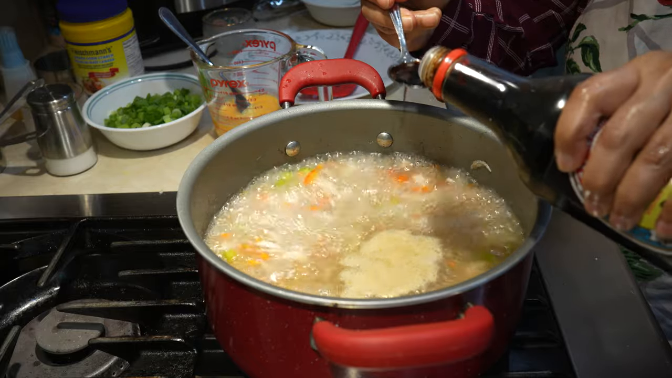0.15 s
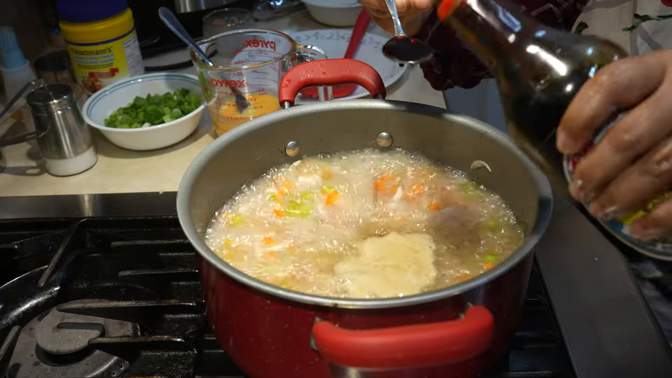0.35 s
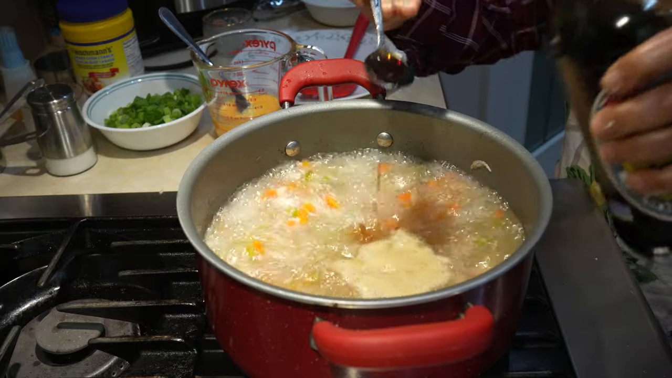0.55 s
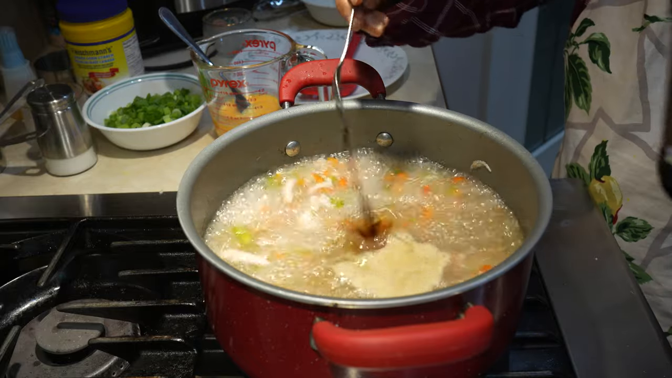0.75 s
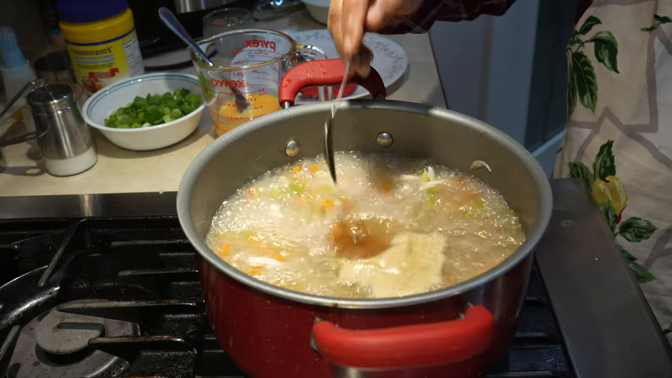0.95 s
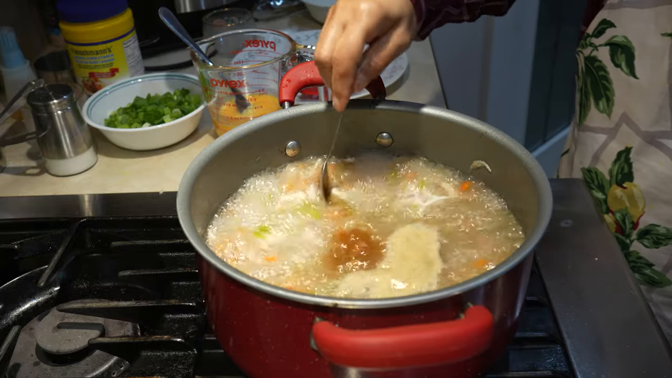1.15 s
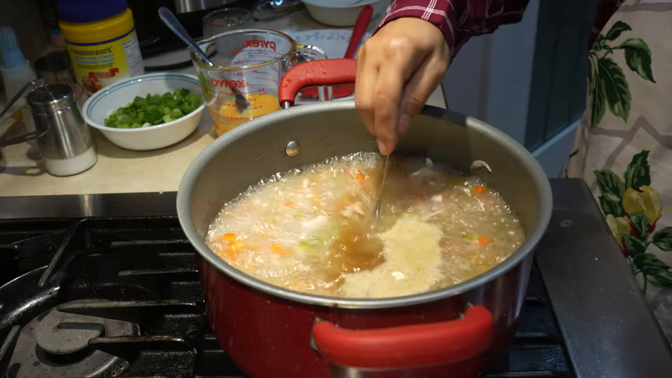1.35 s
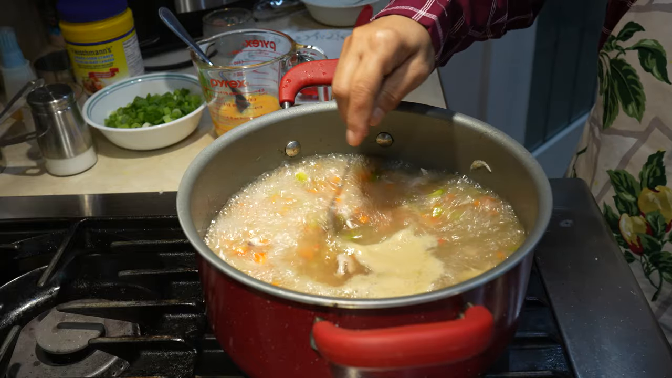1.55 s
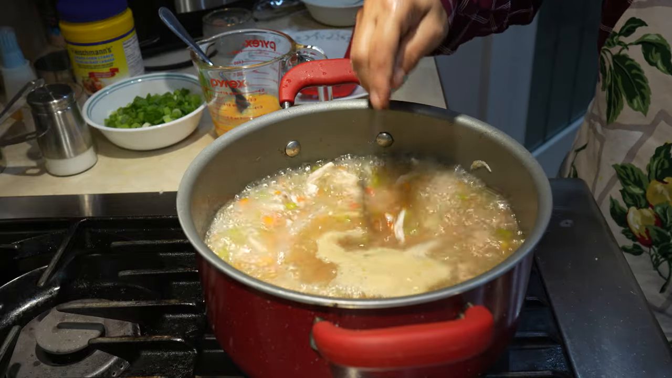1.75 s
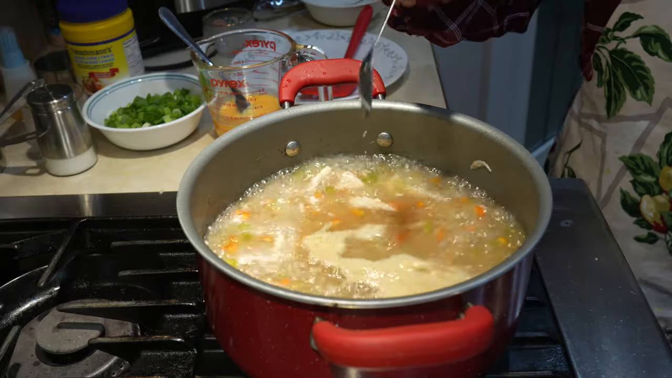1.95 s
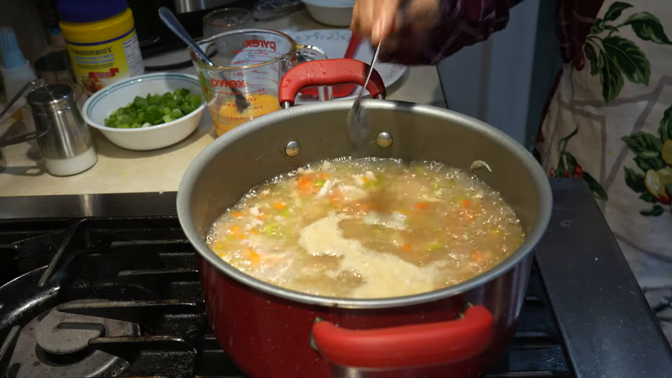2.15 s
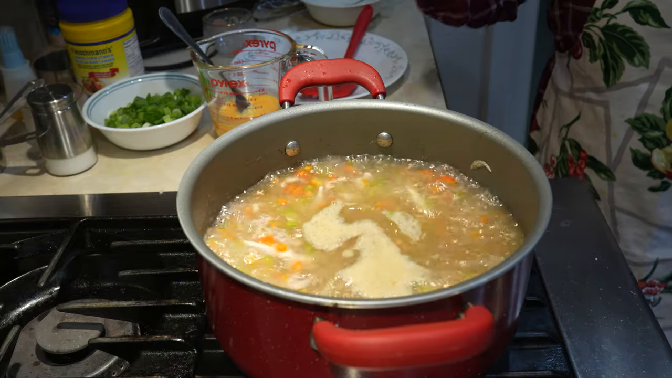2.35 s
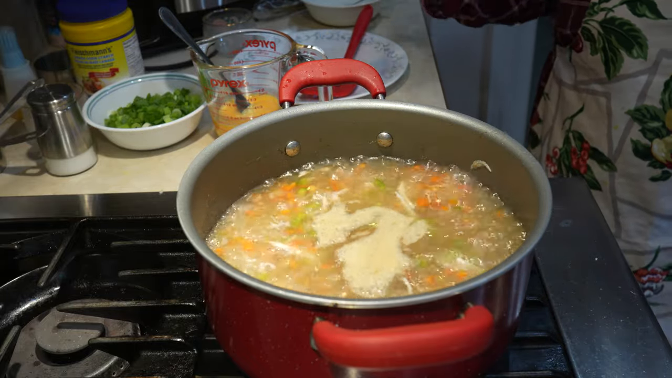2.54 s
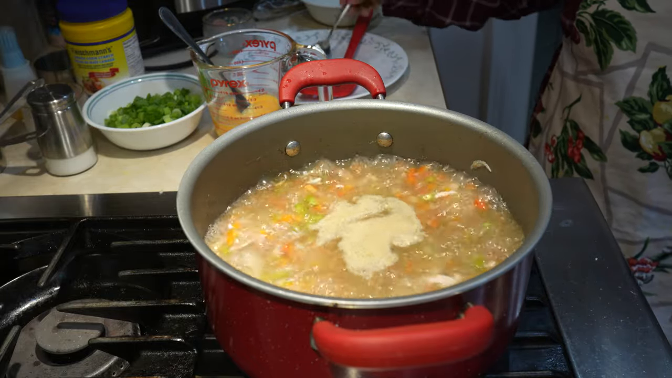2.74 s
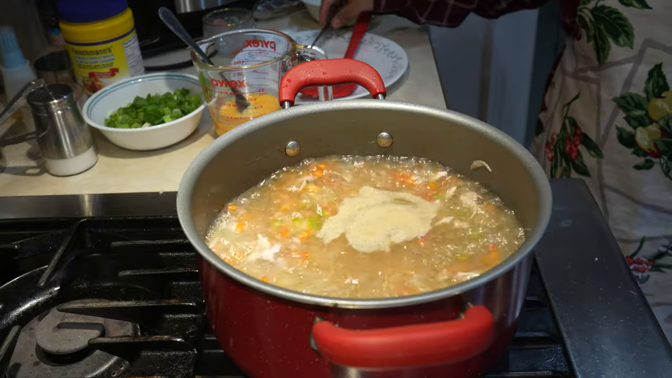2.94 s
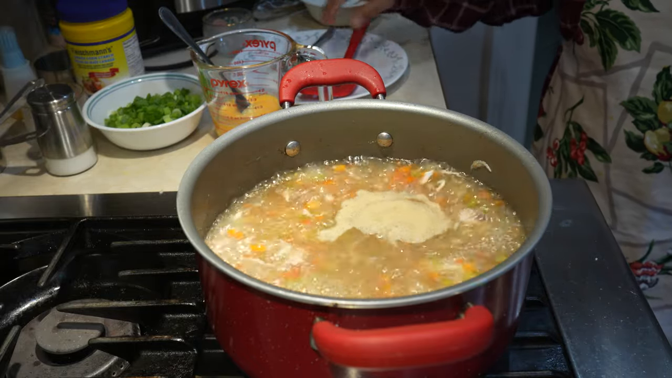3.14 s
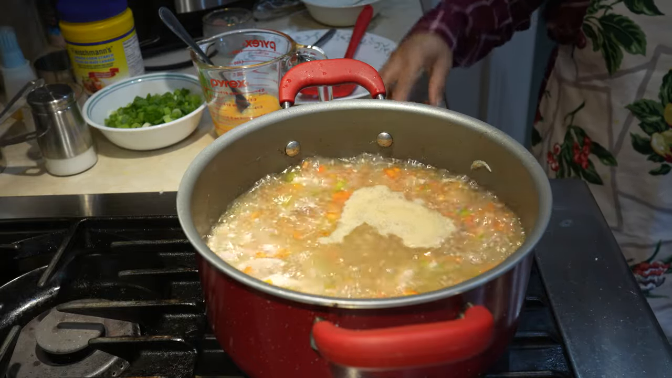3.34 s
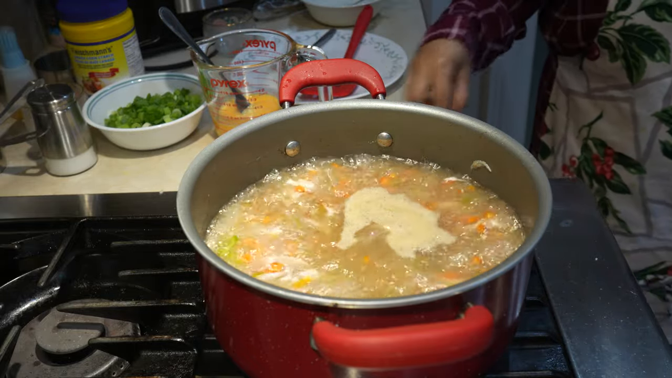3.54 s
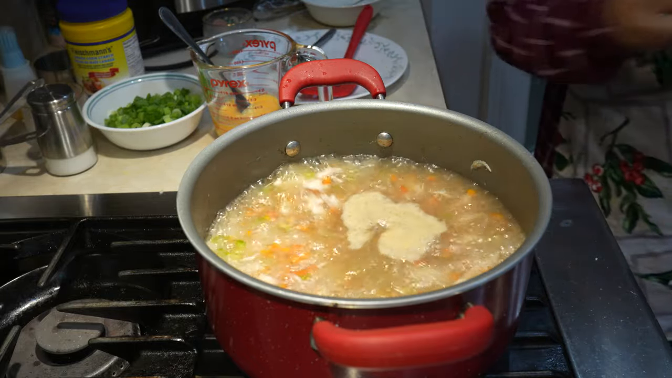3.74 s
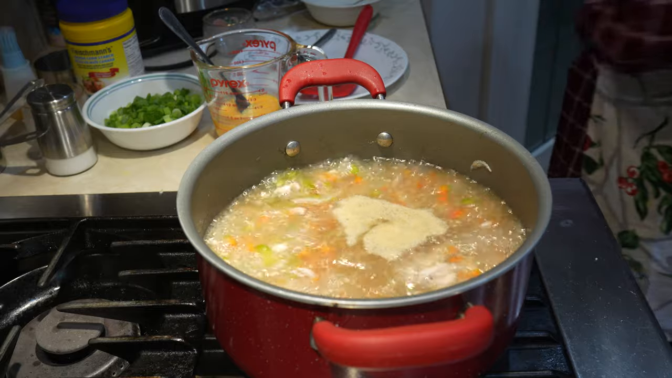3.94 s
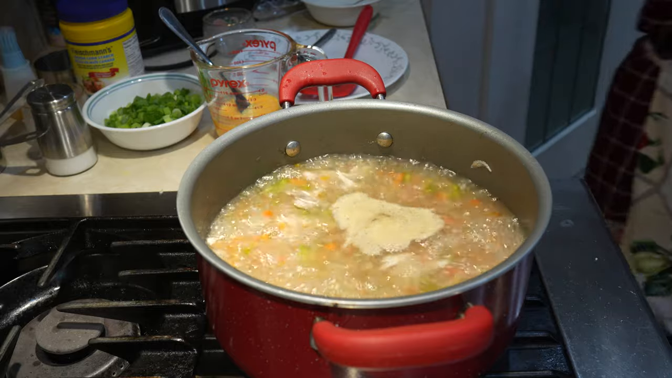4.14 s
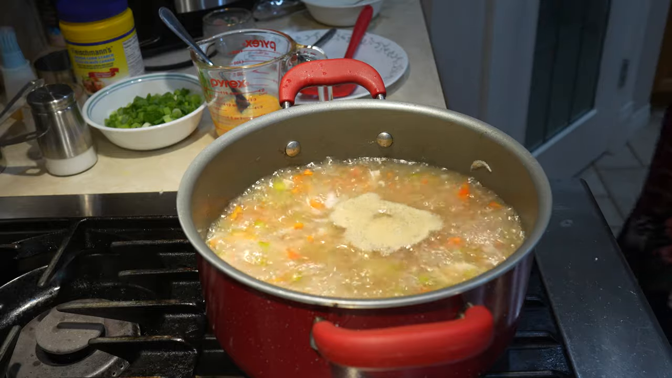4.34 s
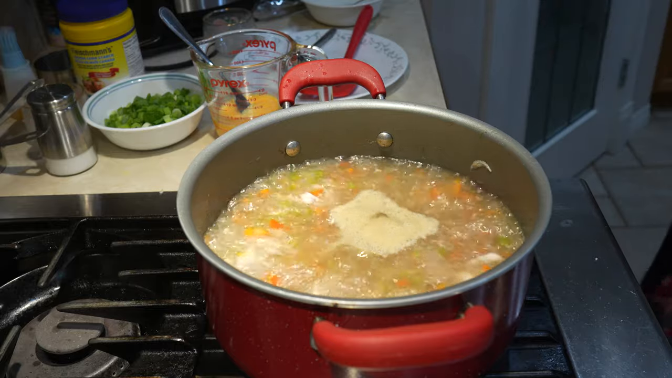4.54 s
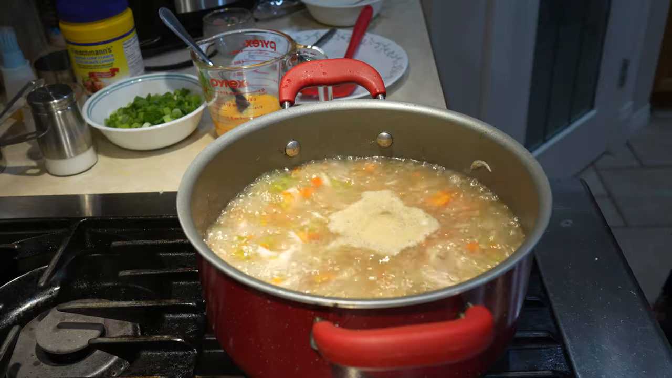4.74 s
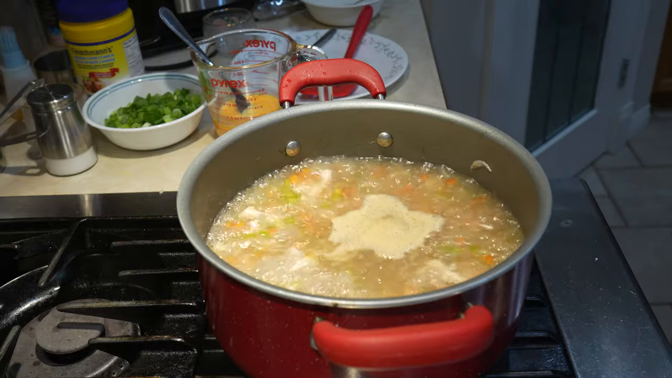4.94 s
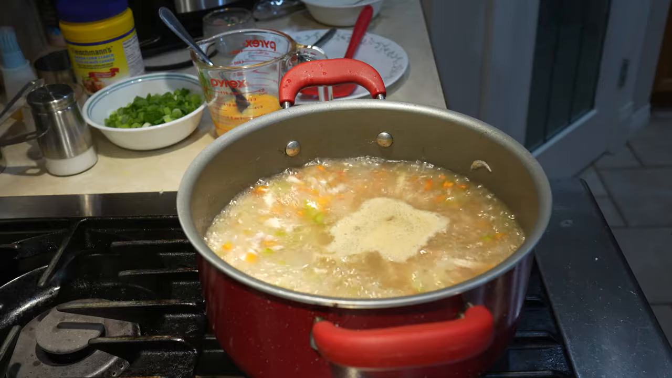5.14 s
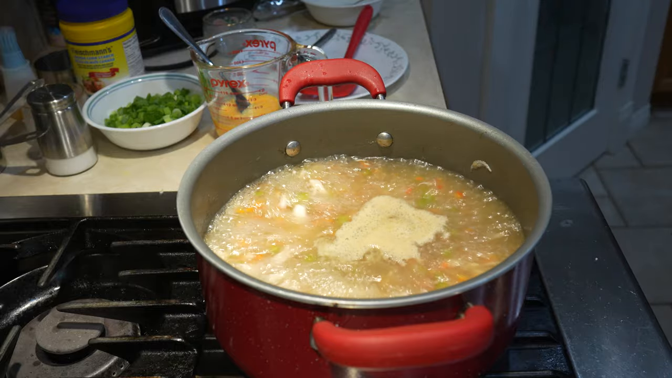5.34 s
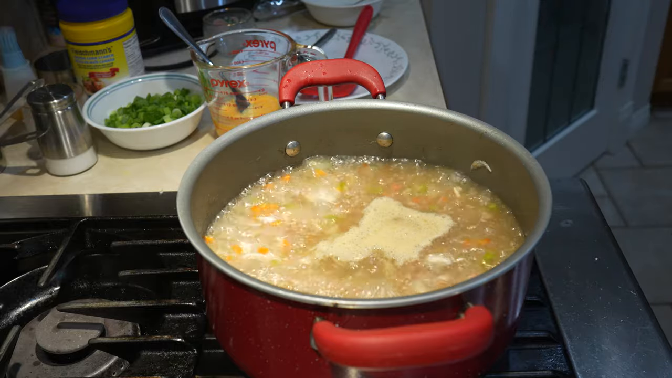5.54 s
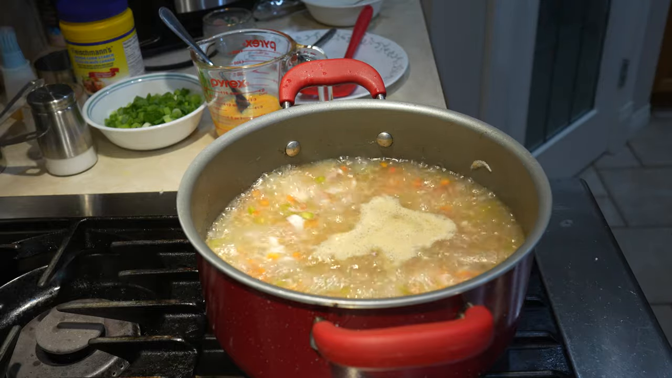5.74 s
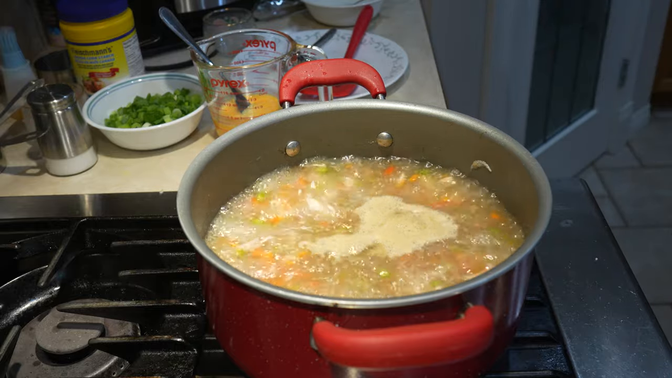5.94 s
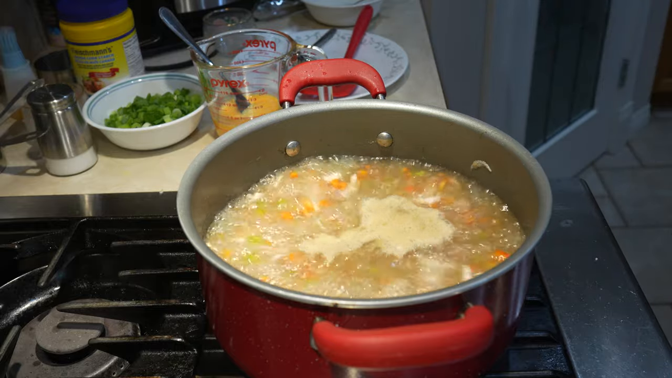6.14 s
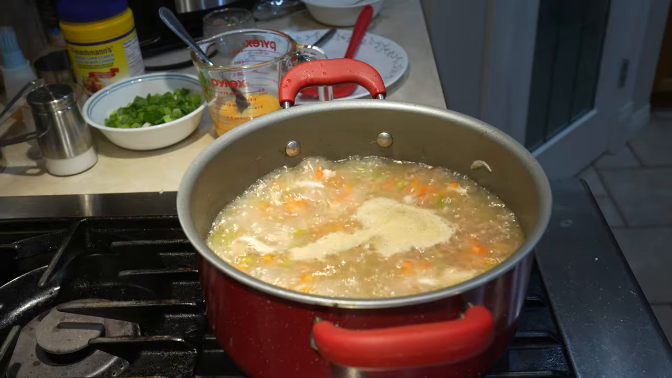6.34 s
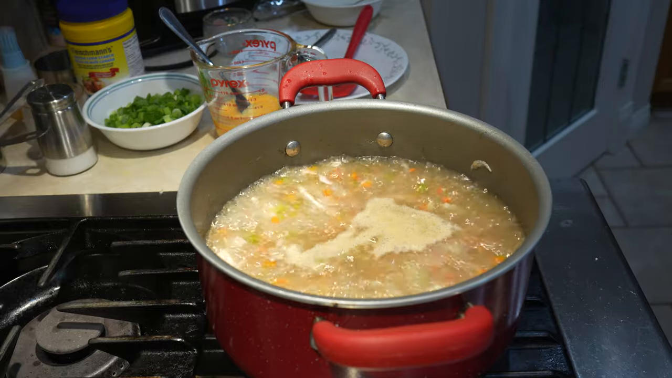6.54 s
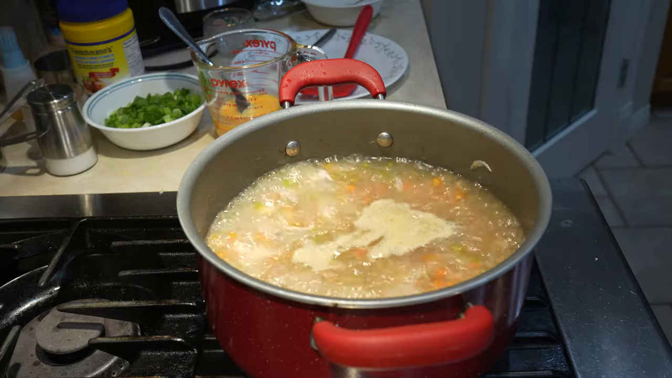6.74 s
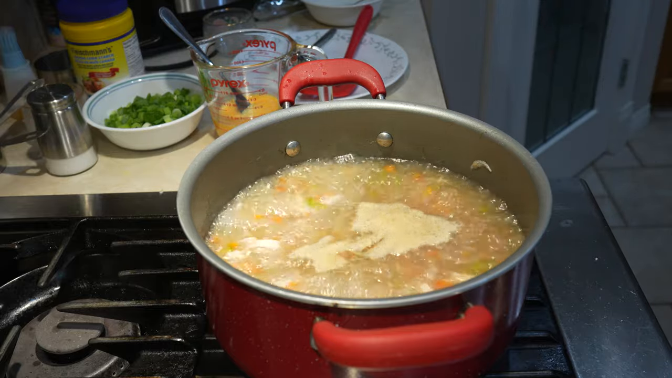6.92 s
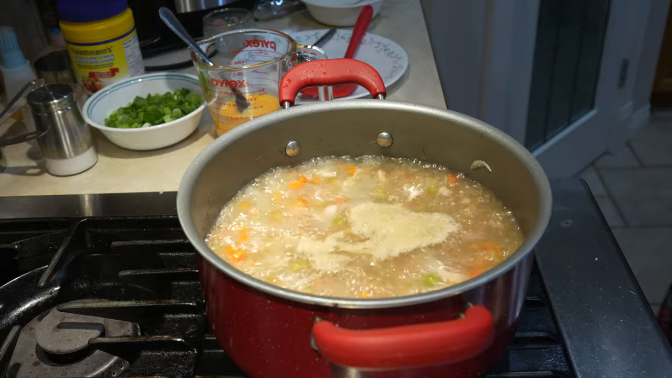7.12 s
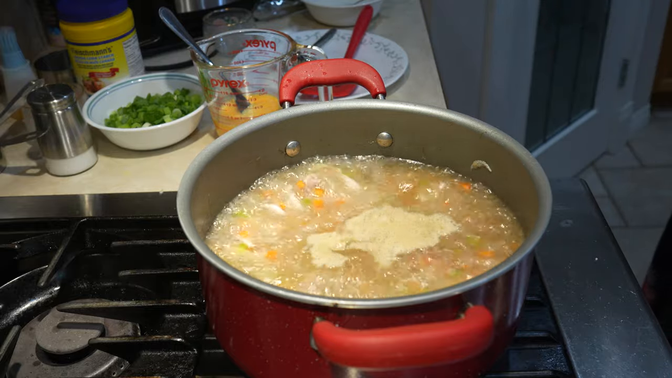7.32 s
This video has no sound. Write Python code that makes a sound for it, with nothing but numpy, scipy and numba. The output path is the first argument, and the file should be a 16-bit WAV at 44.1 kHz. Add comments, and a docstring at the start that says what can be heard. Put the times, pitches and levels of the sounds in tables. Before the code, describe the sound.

Soup boils continuously in a kitchen, fizzing and fluttering over gas hiss. A few liquid plops and a dry cap snap come first, then a spoon is set on a plate with two sharp, gritty clinks. Sleeves and footwear brush faintly as the cook moves off; later a door knocks dully and rumbles away. The stereo microphone is close to the pot, with a short room tail and faint hum.

```python
"""In a kitchen, a wide pot of soup boils on a gas burner close by: tiny rings of bursting foam over gas hiss.
A bottle cap snaps in stiff plastic clicks, and single drips and bubbles chirp upward in pitch.
A steel spoon meets a plate in two scraping clinks: blows and grinding ring the modes of both.
Sleeve and slippers rustle as filtered noise; a door thuds in low modes and rumbles as it swings.
A wavering sine makes the mains hum, lone tones fade, and a short room tail follows the events."""
import sys
import numpy as np
from scipy import signal
from scipy.fft import rfft, irfft, next_fast_len
from scipy.io import wavfile
from scipy.ndimage import uniform_filter1d
from numba import njit

SR = 44100
rng = np.random.default_rng(int(sys.argv[2]) if len(sys.argv) > 2 else 0)


def boost(x):
    """Linear amplitude factor 10**(x/20) for a level x in decibels (scalar or array-like)."""
    u = np.asarray(x, float) / 20
    return 10 ** u


def log_audio(samples):
    """Write samples as a 16-bit WAV file to the path given in sys.argv[1]."""
    # one column per channel
    frames = np.atleast_2d(samples).T
    # limit to full scale, then quantise
    limited = np.clip(frames, -1, 1)
    pcm = np.round(limited * 32767).astype(np.int16)
    wavfile.write(sys.argv[1], SR, pcm)


N = 329868
T = np.arange(N) / SR  # time of each sample [s]
LEFT_RIGHT = np.array([[1], [-1]])  # signs that turn a side signal into left and right


def rms1(x):
    """Scale to unit rms."""
    return x / np.sqrt(np.mean(x ** 2))


def shape(table, hz):
    """Read a table of (frequency [Hz], value) on a logarithmic frequency axis."""
    f, v = np.transpose(table)
    return np.interp(np.log(hz + 1), np.log(f), v)


def colour(x, gain):
    """Filter by a gain that is a function of frequency."""
    size = next_fast_len(N + SR)
    hz = np.arange(size // 2 + 1) * SR / size
    return irfft(rfft(x, size) * gain(hz), size)[..., :N]


def curve(s, db):
    """Gain along a dB curve, silent outside it."""
    return boost(np.interp(T, s, db, left=-200, right=-200))


def swell(start, stop, db, rise_db_per_s, fall_db_per_s):
    """Gain that climbs until start, holds until stop and then dies away."""
    before, after = np.maximum(start - T, 0), np.maximum(T - stop, 0)
    return boost(db - rise_db_per_s * before - fall_db_per_s * after)


def burst(start, fade_s):
    """Gain that jumps to 1 at start and fades exponentially."""
    return np.exp(-np.maximum(T - start, 0) / fade_s) * (T > start)


def walk(rate):
    """Random levels that glide to a new value rate times a second; unit rms."""
    k = int(SR / rate)
    held = np.repeat(rng.standard_normal(N // k + 1), k)
    return rms1(uniform_filter1d(held, k)[:N])


def sides(x, pan_db):
    """Place a sound left (positive) or right (negative)."""
    return x * boost(np.array([[pan_db], [-pan_db]]) / 2)


@njit
def grains(n, sr, s, size, hz, t60, glide, side):
    """Damped sines that may glide upward; row 0 is the middle, row 1 the side signal."""
    out = np.zeros((2, n))
    for k in range(len(s)):
        i, length = int(s[k] * sr), int(t60[k] * sr) + 1
        fade = np.exp(-np.log(1000.) / length)  # 60 dB over the length
        phase, g = 0., size[k]
        for j in range(min(length, n - i)):
            phase += 2 * np.pi * hz[k] * (1 + glide[k] * j / length) / sr
            g *= fade
            out[0, i + j] += g * np.sin(phase)
            out[1, i + j] += g * np.sin(phase) * side[k]
    return out


def strike(s, db, modes, weights, spread_db=1.0, detune=.004):
    """Each blow rings every mode of a body with its own strength, sign and slight detuning."""
    hz, mode_db, t60 = np.transpose(modes)
    chance = rng.standard_normal((len(s), 3, len(hz)))
    size = boost(db[:, None] + mode_db + spread_db * chance[:, 0]) * weights
    size = size / np.sqrt(np.sum(boost(mode_db) ** 2))
    full = np.ones_like(size)
    starts, signed = s[:, None] * full, size * np.sign(chance[:, 2])
    columns = (starts, signed, hz * (1 + detune * chance[:, 1]), t60 * full, 0 * full, 0 * full)
    return grains(N, 1. * SR, *(c.ravel() for c in columns))[0]


def through(x, modes):
    """A lasting force rings the modes of a body; unit gain for white noise."""
    t = np.arange(SR // 2) / SR
    ring = sum(boost(db) * np.exp(-np.log(1000) * t / t60) * np.sin(2 * np.pi * hz * t)
               for hz, db, t60 in modes)
    return signal.fftconvolve(x, ring / np.sqrt(np.sum(ring ** 2)))[:N]


# vigour of the boil: (time [s], level [dB])
BOIL_VIGOUR = [(0, -36.5), (.9, -36), (2.2, -37), (3.4, -38.5), (4.3, -38), (7.48, -37.5)]
# tone of the boil: (frequency [Hz], relative level [dB per Hz])
BOIL_TONE = [(15, -28), (25, -3), (55, -4), (123, -0.5), (229, -11.5), (489, -10.5), (607, -16), (796, -16),
             (863, -11.5), (1330, -6.5), (1610, -13), (1890, -4), (4490, -13), (8830, -2), (16000, -2)]
# resonances of the air and wall of the pot: (frequency [Hz], width [Hz], added gain [dB])
POT_PEAKS = [(804.6, 17, 12), (1892, 49, 2), (2857, 164, -2.5), (6000, 300, -5.5), (9840, 430, -11)]
# stereo width: (frequency [Hz], side minus mid [dB])
STEREO_WIDTH = [(60, -25), (110, -25), (200, -7.5), (380, -7), (700, -2.5), (1290, -10), (2380, -1.5),
                (4400, 1), (8120, -1.5), (15000, 1.5)]
# stereo balance: (frequency [Hz], left minus right [dB])
STEREO_TILT = [(60, -1), (110, 1.5), (200, -2), (380, 1), (700, -1.5), (1290, 2), (2380, 1.5), (4400, 3),
               (8120, -2), (15000, 2)]


def boil(level, per_s=4000, cycles=40, scatter=2.5, foam_db=-3.0, flicker_db=2.0):
    """Foam bubbles burst as tiny rings of all pitches, a few much larger, over smooth gas hiss."""
    u = rng.random((int(per_s * N / SR), 4)).T
    start, hz, side = u[0] * N / SR, 600 + 15600 * u[1], 2.7 * (u[3] - .5)
    size = np.sqrt(hz) * boost(np.minimum(-scatter * np.log(1 - u[2]), 12))
    foam = grains(N, 1. * SR, start, size, hz, cycles / hz, 0.14 + 0 * hz, side)
    mix = rng.standard_normal((2, N)) + boost(foam_db) * rms1(foam)

    # patches of foam of one bubble size collapse together:
    # each range of pitch flutters, hiss included, partly with the rest
    shared, edges = walk(35), [0, 3500, 7000, 10500, 13000, SR]
    fluttering = 0
    for lo, hi in zip(edges, edges[1:]):
        band = colour(mix, lambda f: (f >= lo) & (f < hi))
        depth_db = flicker_db * min(hi / 9000, 1)
        fluttering = fluttering + band * boost(depth_db * (0.35 * shared + 0.4 * walk(60)))

    def peaks(f):
        return 1 + sum(boost(db) / (1 + (2 * (f - c) / w) ** 2) for c, w, db in POT_PEAKS)

    mid = colour(fluttering[0], lambda f: boost(shape(BOIL_TONE, f)) * peaks(f))
    side = colour(fluttering[1], lambda f: boost(shape(BOIL_TONE, f) + shape(STEREO_WIDTH, f)) * peaks(f))
    pair = np.array([colour(mid + way * side, lambda f: boost(way * shape(STEREO_TILT, f) / 2))
                     for way in (1, -1)])
    return level * pair / np.std(mid)


# blows of spoon on plate: (time [s], strength [dB], share taken by the plate [0-1], left minus right [dB])
SPOON_BLOWS = [(2.812, -10, 0.96, 1), (2.826, -18, 1, 0), (2.842, -19, 1, 0), (2.879, -20.5, 1, -4),
               (3.024, -39, 0.3, 8), (3.045, -39, .1, 0), (3.0759, -28, 0.9, 4), (3.1305, -9, 0, 2),
               (3.1991, -9, 0.05, 0), (3.2362, -21, 0.5, 1), (3.4196, -36, 0.75, 2)]
# two slides of the spoon on the glaze: (time [s], force [dB], pressure on the plate [0-1])
SPOON_SLIDES = [
    [(2.812, -24.5, 0.84), (2.86, -24, 0.94), (2.89, -25.5, 0.97), (2.968, -37, 0.95), (3.125, -38.5, 1)],
    [(3.131, -30, 0), (3.185, -16.5, 0.2), (3.205, -20, 0.35), (3.24, -24.5, 0.42), (3.27, -34.5, 0.8),
     (3.38, -59, 0.6)],
]
# ringing modes of the steel spoon: (frequency [Hz], relative level [dB], time to fade by 60 dB [s])
SPOON_MODES = [(2980, -14, .1), (3304, -11, .4), (3987, -5, .07), (4025, -5, .08), (4054, -6, .1),
               (4088, -11, .08), (4222, -11, .12), (4438, -8, .13), (4480, -12, .13), (4600, -9, .06),
               (4951, -3.5, .18), (5700, -9, .04), (6981, -4, .05), (7340, -10, .06), (7745, -7, .13),
               (8048, -8, .11), (8441, -10, .08), (9245, -12, .2), (10381, -10, .2), (11085, -9, .12),
               (12180, -14, .12), (13230, -13, .08), (14640, -12, .08)]
# ringing modes of the plate: (frequency [Hz], relative level [dB], time to fade by 60 dB [s])
PLATE_MODES = [(950, -18, .025), (1390, -4, .02), (1880, -3, .025), (2330, -4, .02), (3150, -6, .02),
               (4100, -8, .04), (4360, -8, .04), (5380, -3, .025), (6400, -2, .02), (7170, -8, .04),
               (7300, -6, .05), (7510, -9, .04), (8930, -10, .05), (10400, -8, .04), (10690, -6, .07),
               (10900, -9, .04), (11900, -12, .04), (12357, -8, .11), (12449, -7, .11), (14310, -7, .05)]
# tone of the grinding contact: (frequency [Hz], relative level [dB per Hz])
GRIND_TONE = [(600, -34), (1000, -18), (1800, -2.5), (3200, -1.5), (4200, -0.5), (7500, 1.5), (8800, -1),
              (15000, -2)]


def spoon(plate_db=-5.5, steel_db=-1.5, crack_db=-8, crack_s=0.0082, rub_db=-5,
          steel_blow_db=-8.5, plate_blow_db=-2.5):
    """Blows crack and ring steel and plate; in its slides the spoon grinds along in dense slips."""
    s, db, share, pan = np.transpose(SPOON_BLOWS)
    share = np.clip(share, 0, 1)[:, None]
    grit = rms1(rng.standard_normal((3, N)) * boost(1.8 * walk(200)))
    hiss = rms1(colour(grit[:2], lambda f: boost(shape(GRIND_TONE, f))))
    hiss = hiss[0] + 1.3 * hiss[1] * LEFT_RIGHT
    rub = colour(hiss, lambda f: 1 / np.sqrt(1 + (f / 7500) ** 8))  # sliding is duller than a blow
    drag = rms1(colour(grit[2], lambda f: 1 / np.sqrt(1 + (f / 7000) ** 4)))

    out = strike(s, db + steel_blow_db, SPOON_MODES, 1 - share, detune=0.00029)
    out = out + strike(s, db + plate_blow_db, PLATE_MODES, share, detune=0.002)
    for start, level, p in zip(s, db, pan):
        out = out + sides(boost(level + crack_db) * burst(start, crack_s), p) * hiss
    for table in SPOON_SLIDES:
        t, level, held = np.transpose(table)
        held, force = np.clip(np.interp(T, t, held), 0, 1), curve(t, level)
        # a spoon pressed down drives the plate; a loose one sings
        out = out + boost(rub_db) * force * rub
        out = out + boost(plate_db) * through(force * held * drag, PLATE_MODES)
        out = out + boost(steel_db) * through(force * (1 - held) * grit[2], SPOON_MODES)
    # things this small radiate little bass
    return signal.sosfilt(signal.butter(3, 900, "high", fs=SR, output="sos"), out)


# clicks of the bottle cap: (time [s], strength [dB])
CAP_SNAPS = [(.8606, -19), (.8645, -14), (.8671, -21)]
# ringing modes of the cap: (frequency [Hz], relative level [dB], time to fade by 60 dB [s])
CAP_MODES = [(537, -9.5, 0.045), (1130, -10, 0.017), (1900, -12, 0.01), (2800, -2.5, 0.0074),
             (5530, -4, 0.0081), (6970, 5.5, 0.012), (7800, -1, 0.012), (9900, -2, .004)]


def bottle_cap():
    """Stiff plastic clicks: each snap rings short modes, slightly to the right."""
    return sides(strike(*np.transpose(CAP_SNAPS), CAP_MODES, 1, detune=0.029), -1.5)


# drips, large bubbles and small ticks: (time [s], peak level [dB], starting pitch [Hz])
DRIP_PLOPS = [(0.382, -23, 5600), (.42, -31, 2800), (.511, -35, 1140), (.648, -37, 980), (.77, -39.5, 900),
              (0.873, -25.5, 2800), (.886, -37, 1500), (1.205, -32.5, 1090), (1.315, -39, 1390),
              (2.08, -44, 1320), (2.485, -26, 5000), (5.195, -42, 790)]
PLOP_CYCLES, PLOP_GLIDE = 29, .05  # cycles (at starting pitch) to fade by 60 dB, share by which pitch rises


def drips():
    """Single bubbles chirp upward; small high ones die sooner."""
    s, db, hz = np.transpose(DRIP_PLOPS)
    return grains(N, 1. * SR, s, boost(db), hz, PLOP_CYCLES / hz, PLOP_GLIDE + 0 * s, 0 * s)[0]


# thuds through floor and cupboard: (time [s], strength [dB], brightness [0-1])
DOOR_THUDS = [(3.448, -35.5, 0.07), (4.23, -44, 0.9), (4.873, -45, 0.8), (5.967, -23, 0.98),
              (5.984, -20.5, 0.26), (6.035, -22, 0.2), (6.084, -36, 0.4), (6.1, -44, 0.5),
              (6.186, -32.5, 0.8), (6.205, -32.5, 0.45), (6.26, -37, .5), (6.345, -42, 0.8),
              (6.39, -42, .8), (6.789, -44, 0.2)]
# ringing modes of the cupboard: (frequency [Hz], relative level [dB], time to fade by 60 dB [s])
CUPBOARD_MODES = [(55, -14, .12), (87, -4.5, 0.2), (112, -10, .1), (140, -3.5, 0.24), (172, -7.5, 0.13),
                  (211, -7.5, 0.13), (284.3, -8, 0.17), (338, -7, 0.063), (430, -8, 0.07), (469, -8.5, .08),
                  (547, -14.5, 0.15), (730, -10, 0.053), (835, -20, 0.036), (1082, -16, 0.087),
                  (1275, -21, 0.098), (1570, -19, 0.022), (1890, -15, .03), (2240, -17, .025),
                  (2920, -18, .025)]
# the door swings on, rumbling: (start [s], holds until [s], strength [dB])
DOOR_SWING = (5.97, 6.42, -43.5)
SWING_DIES_DB_PER_S = 32


def cupboard(crack_db=-11, crack_s=0.029):
    """Soft blows wake the low modes, bright ones crack too; the swinging door murmurs and rumbles."""
    s, db, bright = np.transpose(DOOR_THUDS)
    bright = np.clip(bright, 0, 1)
    reach_hz = 150 * 20 ** bright[:, None]  # modes above this are woken less
    weights = 1 / np.sqrt(1 + (np.transpose(CUPBOARD_MODES)[0] / reach_hz) ** 2)
    thuds = strike(s, db, CUPBOARD_MODES, weights, spread_db=0.5, detune=0.01)

    swing = swell(*DOOR_SWING, 0, SWING_DIES_DB_PER_S) * (T > DOOR_SWING[0])
    push = swing * rng.standard_normal((2, N)) * boost(3.6 * walk(25))
    murmur = colour(through(push[0], CUPBOARD_MODES), lambda f: 2.4 * f ** 2 / (f ** 2 + 450 ** 2))
    rumble = colour(push[1], lambda f: 4.1 * f ** 2 / (f ** 2 + 350 ** 2) / (1 + (f / 950) ** 2))

    splinter = rms1(colour(rng.standard_normal(N),
                           lambda f: f ** 2 / (f ** 2 + 500 ** 2) / (1 + (f / 2200) ** 2)))
    cracks = sum(boost(d + crack_db) * b ** 2 * burst(start, crack_s) for start, d, b in zip(s, db, bright))
    return thuds + murmur + rumble + cracks * splinter


# lone tones, perhaps worktop and dishes set ringing:
# (time [s], peak level [dB], frequency [Hz], time to fade by 60 dB [s])
LONE_RINGS = [(1.78, -53, 664, 1), (2.62, -48, 524, 0.14), (3.134, -43, 397, .06), (3.15, -47, 284, 0.4),
              (3.19, -45, 148, 0.5), (3.195, -42, 430, 0.08), (3.2, -44, 516, 0.11),
              (3.195, -49, 603, 0.06), (6.25, -46, 466, 0.6), (3.449, -33.5, 162, 0.12),
              (3.53, -40, 152, .25), (6.345, -45.5, 563, 0.8), (6.37, -45, 1084, 0.41)]


def rings():
    """Single steady tones, each fading alone."""
    s, db, hz, t60 = np.transpose(LONE_RINGS)
    return grains(N, 1. * SR, s, boost(db), hz, t60, 0 * s, 0 * s)[0]


# drags of sleeve and slippers: (full speed from [s], until [s], strength [dB], brightness [0-1])
CLOTH_DRAGS = [(0.252, 1.202, -48.5, 0.51), (1.84, 1.95, -43.5, 0.69), (2.573, 2.652, -39.5, 0.5),
               (3.804, 3.9, -51, 0.55), (4.604, 4.66, -48.5, 1), (4.72, 4.887, -41, 0.95),
               (5.0, 5.033, -43.5, 0.62), (6.2, 6.45, -55, 0.2), (7.4, 7.48, -53, 0.9)]
# tone of the cloth: (frequency [Hz], relative level [dB per Hz])
CLOTH_TONE = [(300, -11.5), (600, -5.5), (1200, 2), (2200, 3), (4500, -4), (7000, -6), (12000, -14)]
DRAG_RISE_DB_PER_S, DRAG_STOP_DB_PER_S = 74, 180  # a drag gathers speed, then stops short
RESTING_DB, RESTING_BRIGHT = -52.5, 0.52  # strength and brightness 0-1: the cloth is never quite still


def rustle():
    """Cloth and soles drag in fine uneven fibres; a lighter, quicker drag is brighter."""
    dull, sharp = boost(RESTING_DB) * (1 - RESTING_BRIGHT), boost(RESTING_DB) * RESTING_BRIGHT
    for start, stop, db, bright in CLOTH_DRAGS:
        drag = swell(start, stop, db, DRAG_RISE_DB_PER_S, DRAG_STOP_DB_PER_S)
        bright = np.clip(bright, 0, 1)
        dull, sharp = np.hypot(dull, drag * (1 - bright)), np.hypot(sharp, drag * bright)
    uneven = rng.standard_normal((2, N)) * boost(1.03 * walk(60))
    fibres = rms1(colour(uneven, lambda f: boost(shape(CLOTH_TONE, f))))
    low = colour(fibres, lambda f: 1 / (1 + (f / 2500) ** 2))
    mid, side = (dull * low + sharp * (fibres - low)) * 2
    return mid + 0.68 * side * LEFT_RIGHT


HUM_HZ, HUM_DB = 119.7, -63  # pitch, and rms level about which the hum wavers


def hum():
    """Mains hum: a sine whose strength and phase waver."""
    strength = np.sqrt(2) * boost(HUM_DB + 2.0 * walk(12))
    return strength * np.sin(2 * np.pi * HUM_HZ * T + 1.56 * walk(5))


ROOM_T60_S, ROOM_DB = 0.38, -3.5  # time to fade by 60 dB, gain of the tail before it is dulled


def kitchen(x):
    """Room echo: a short diffuse tail, different left and right, duller than the direct sound."""
    t = np.arange(SR // 2) / SR
    tail = rng.standard_normal((2, len(t))) * np.exp(-np.log(1000) * t / ROOM_T60_S) * (t > .004)
    tail = tail / np.sqrt(np.sum(tail ** 2, axis=1, keepdims=True))
    wet = signal.fftconvolve(x.mean(0, keepdims=True), tail, axes=1)[:, :N]
    # microphone ports close together hear the bass alike
    mid = wet.mean(0)
    side = colour((wet[0] - wet[1]) / 2, lambda f: boost(np.minimum(shape(STEREO_WIDTH, f), 0)))
    dulled = colour(mid + side * LEFT_RIGHT, lambda f: 1 / np.sqrt(1 + (f / 6000) ** 2))
    return x + boost(ROOM_DB) * dulled


def scene():
    """Steady stove, the cook's movements, and the room."""
    events = spoon() + bottle_cap() + drips() + cupboard() + rings()
    return boil(curve(*np.transpose(BOIL_VIGOUR))) + hum() + rustle() + kitchen(events)


def top_cut(x):
    """Nothing passes above the cut-off."""
    return signal.sosfilt(signal.butter(12, 16830, fs=SR, output="sos"), x)


TOP_HZ = 15820  # edge of the steep treble cut


def record(dry):
    """A small camera cuts the top of the treble with a steep low-pass."""
    low_pass = signal.ellip(8, .2, 60, TOP_HZ, fs=SR, output="sos")
    mix = signal.sosfilt(low_pass, dry)
    return top_cut(mix)


dry = scene()
out = record(dry)
log_audio(out)
```